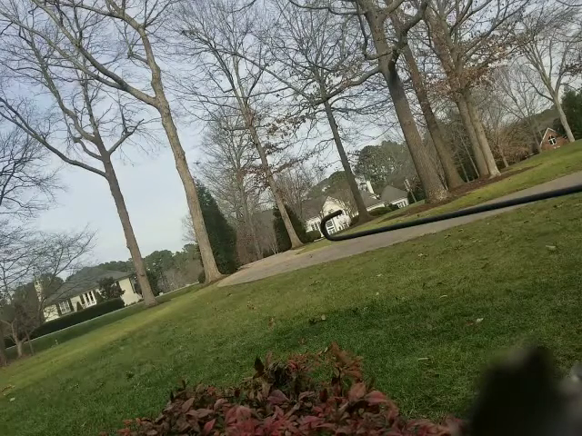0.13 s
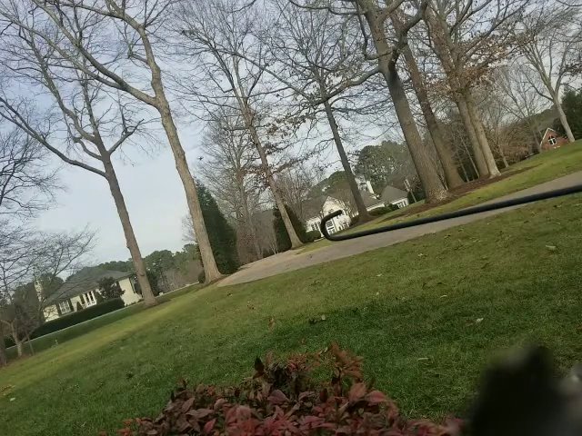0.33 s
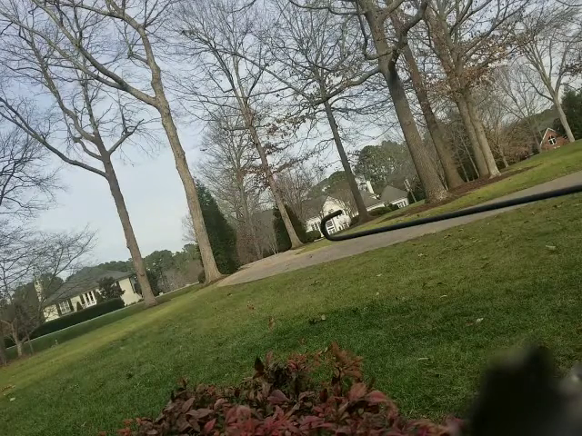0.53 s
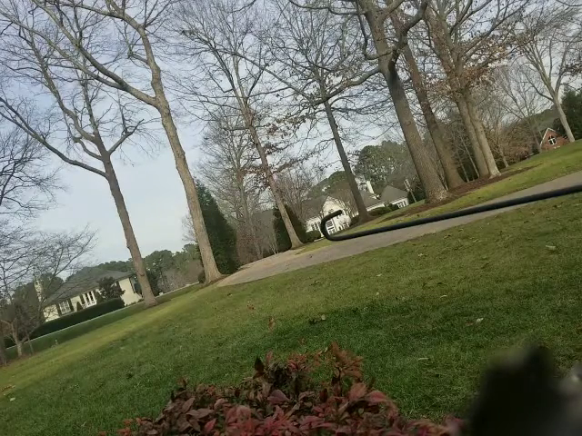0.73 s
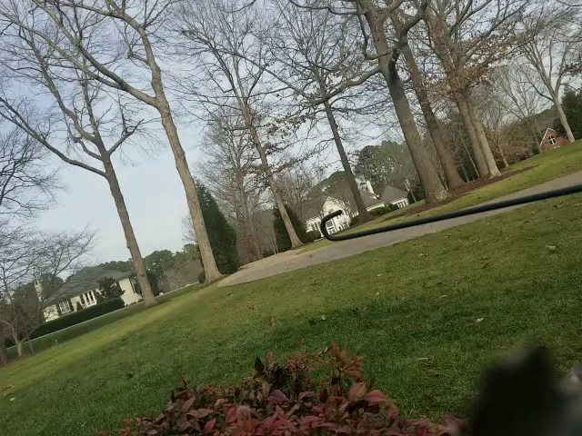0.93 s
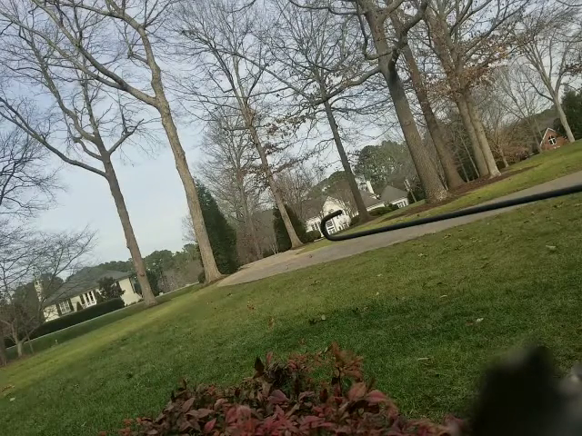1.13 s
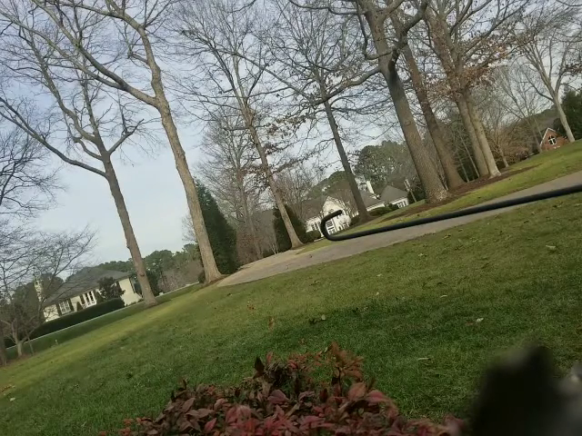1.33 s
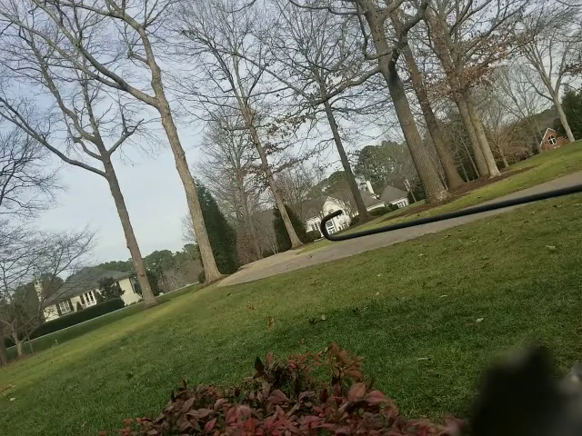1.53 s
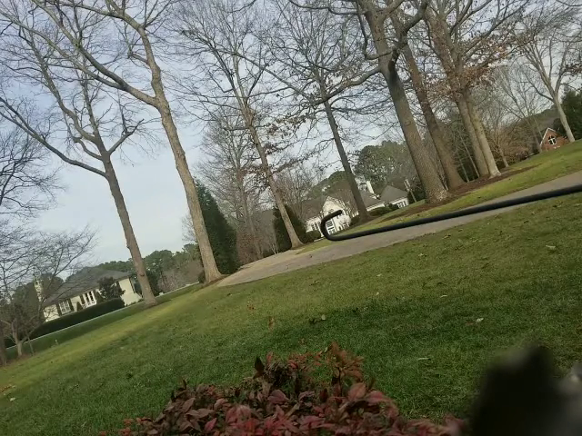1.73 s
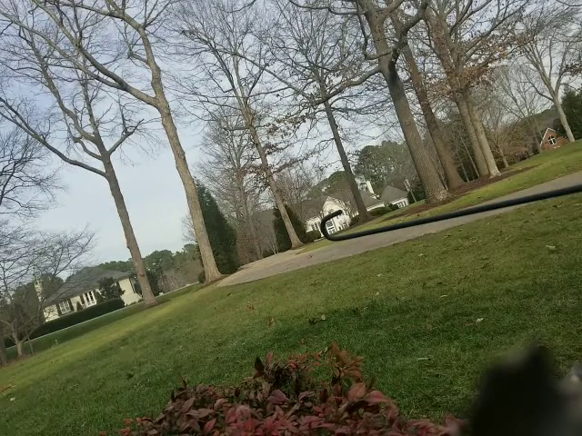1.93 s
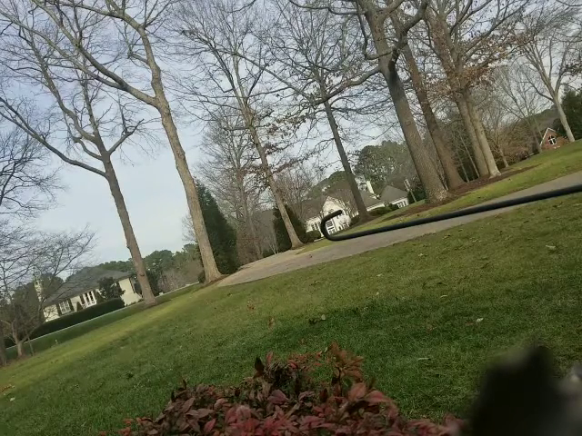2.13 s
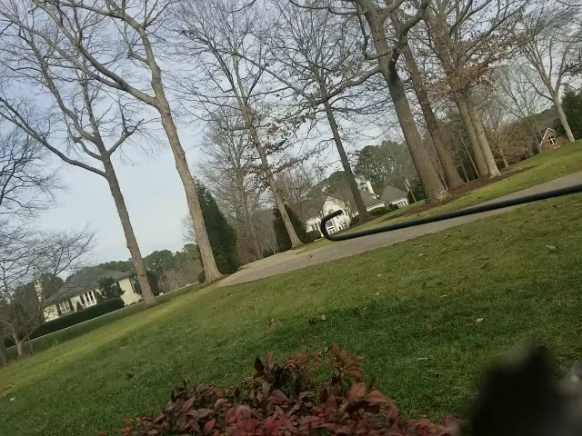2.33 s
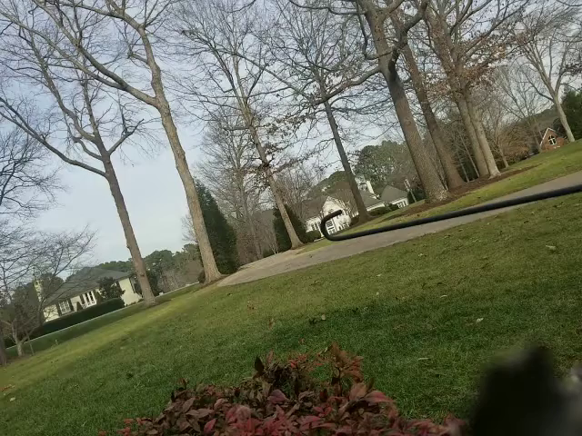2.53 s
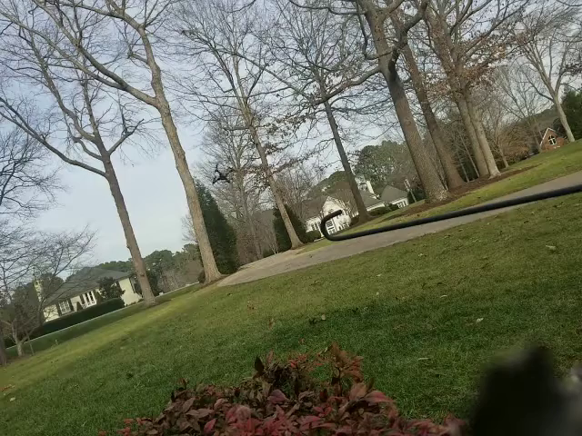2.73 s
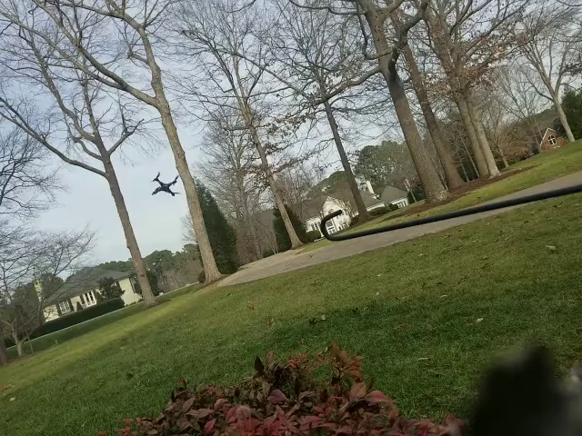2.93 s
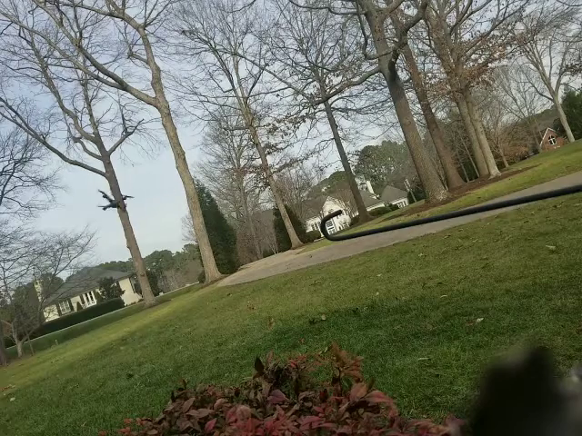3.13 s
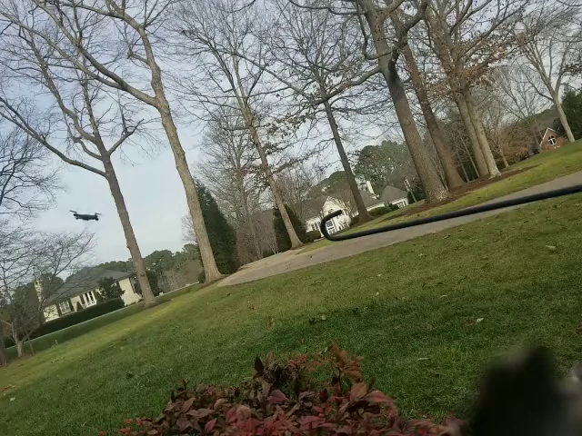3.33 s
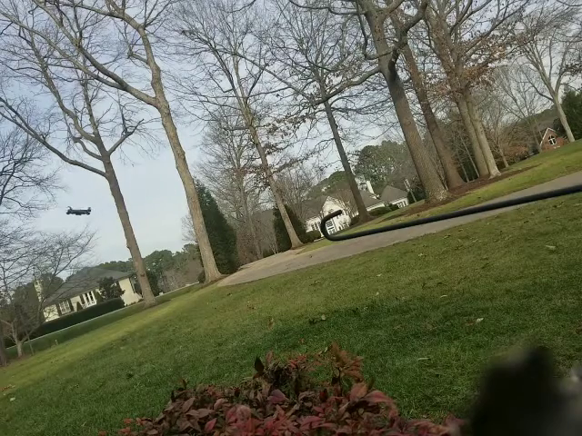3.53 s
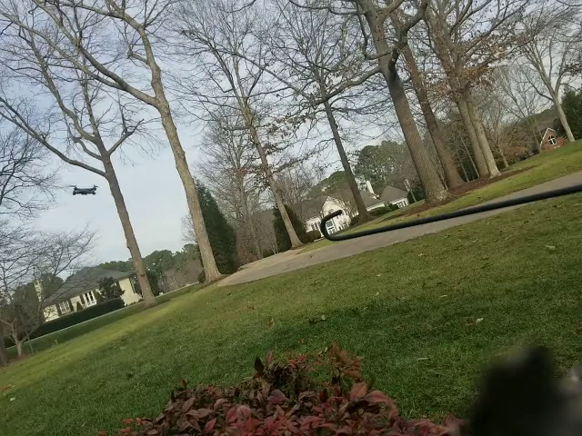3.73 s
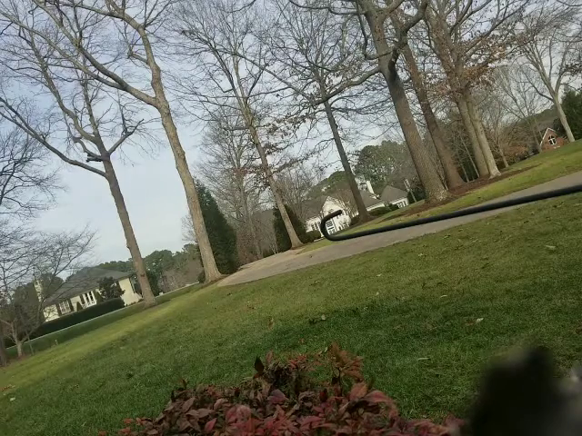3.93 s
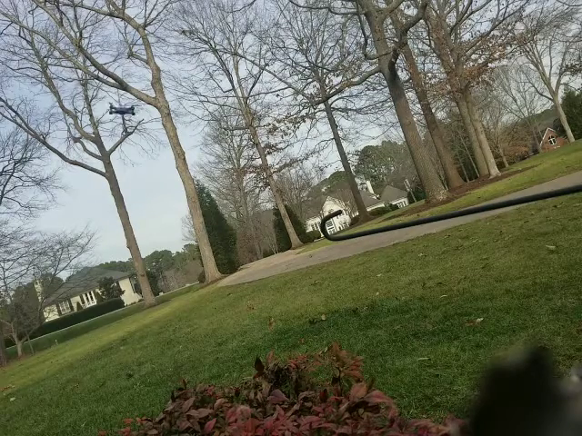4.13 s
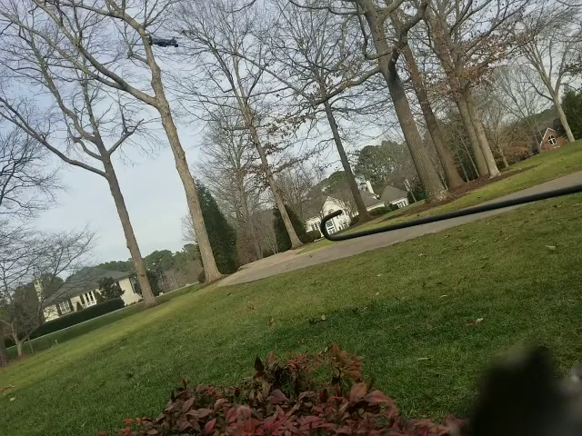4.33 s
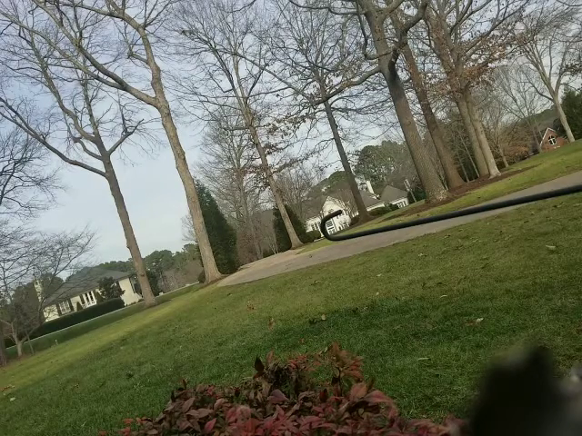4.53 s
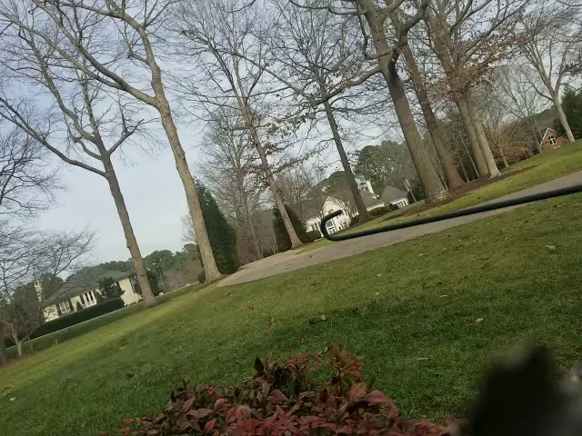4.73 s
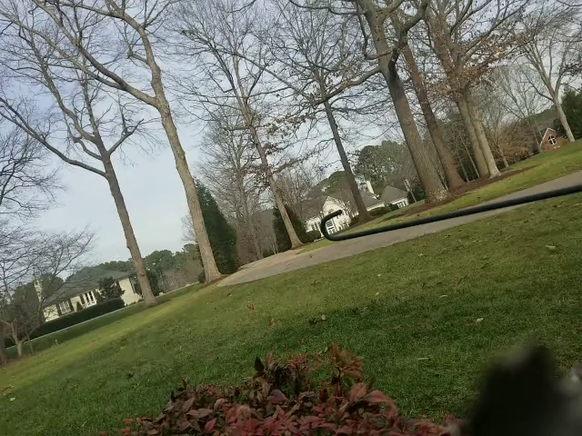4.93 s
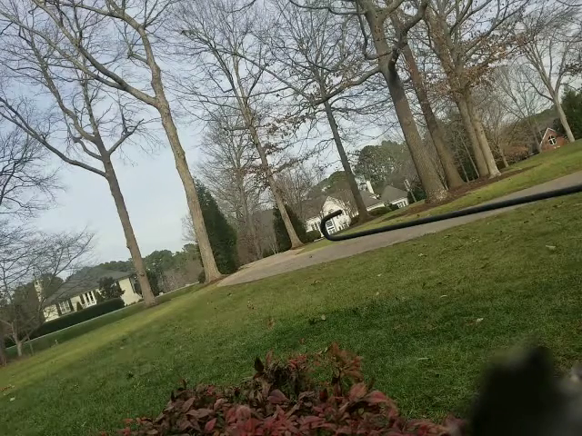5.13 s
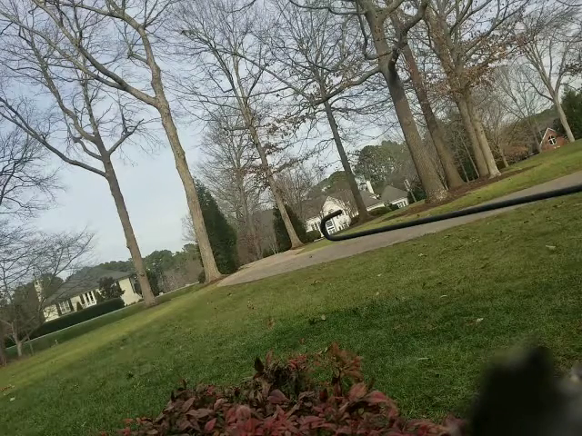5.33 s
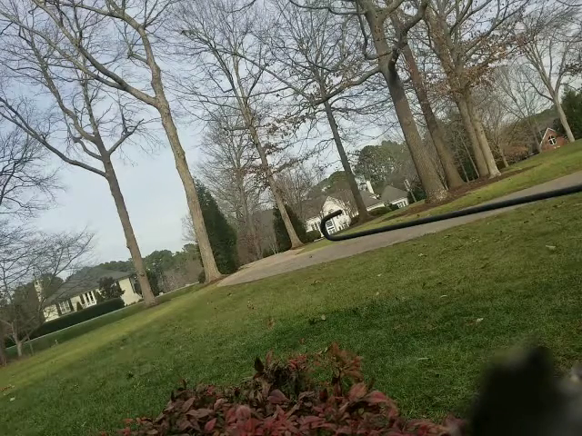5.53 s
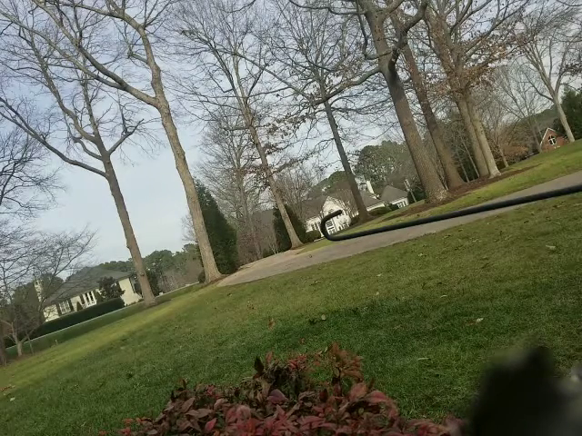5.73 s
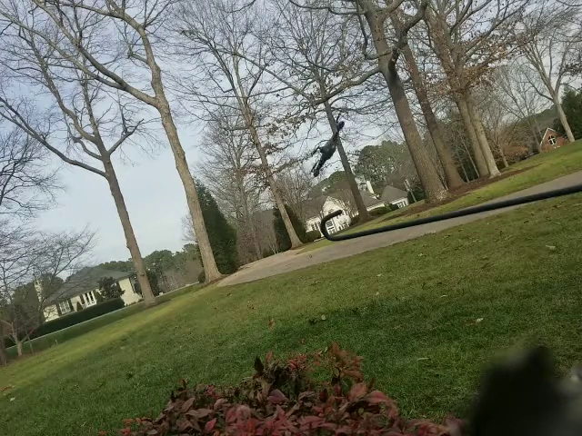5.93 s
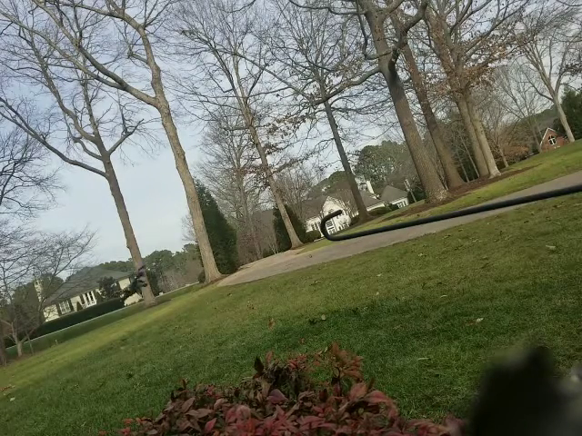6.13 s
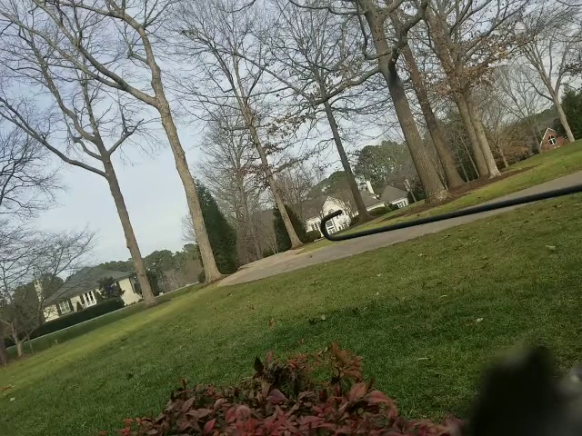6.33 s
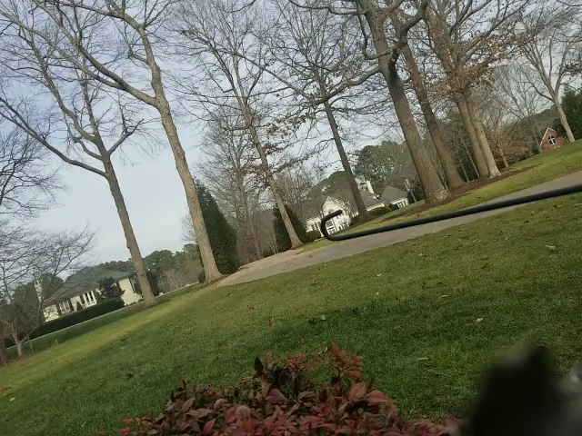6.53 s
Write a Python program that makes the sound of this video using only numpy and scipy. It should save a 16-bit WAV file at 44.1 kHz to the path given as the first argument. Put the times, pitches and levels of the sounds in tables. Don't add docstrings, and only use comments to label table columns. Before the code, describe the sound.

Outdoors in the grass, a toy drone's tiny motors whine in a rough, high cluster, with fizzing blade tips, grinding gears and fluttering air. It starts modestly, dips in pitch and snaps back, swoops nearer, dips deeply again, then revs up in a loud close pass before easing slightly. Low distant traffic rumbles underneath; the sound is dry and open, shifting a little between sides.

```python
import sys
import numpy as np
from scipy import signal
from scipy.fft import rfft, irfft, next_fast_len
from scipy.io import wavfile
from scipy.ndimage import uniform_filter1d, map_coordinates

SR = 44100
rng = np.random.default_rng(int(sys.argv[2]) if len(sys.argv) > 2 else 0)


def nominal_scale(level):
    x = np.asarray(level, float) / 20
    return 10 ** x


def waveform_to_disk(signal):
    frames = np.transpose(np.atleast_2d(signal))
    scaled = np.clip(frames, -1, 1) * 32767
    samples = np.round(scaled).astype(np.int16)
    wavfile.write(sys.argv[1], SR, samples)


N = 294147
TIME = np.arange(N) / SR
FFT_LENGTH = next_fast_len(N)
BINS_HZ = np.fft.rfftfreq(FFT_LENGTH, 1 / SR) + 1e-9


def columns(table):
    s, *rest = np.transpose(table)
    return [np.interp(TIME, s, c) for c in rest]


def spell(middle_s, length_s):
    return np.exp(-(2 * (TIME - middle_s) / length_s) ** 4)


def walk(rate_hz):
    hold = int(SR / rate_hz)
    steps = np.repeat(rng.standard_normal(N // hold + 1), hold)
    return 1.3 * uniform_filter1d(uniform_filter1d(steps, hold), hold)[:N]


def shape(x, gain):
    return irfft(rfft(x, FFT_LENGTH) * gain, FFT_LENGTH)[:N]


def tint(x, table):
    hz, db = np.transpose(table)
    return shape(x, nominal_scale(np.interp(np.log(BINS_HZ), np.log(hz), db)))


def bands(x, centres_hz):
    place = np.interp(np.log(BINS_HZ), np.log(centres_hz), np.arange(len(centres_hz)))
    return [shape(x, np.clip(1 - abs(place - k), 0, 1)) for k in range(len(centres_hz))]


def unit(x):
    return x / np.sqrt(np.mean(x ** 2))


def rasp(hz, db, width_hz):
    phase = 2 * np.pi * np.cumsum(hz) / SR
    return nominal_scale(db) * (walk(width_hz) * np.cos(phase) + walk(width_hz) * np.sin(phase))


# t/s, front f/Hz, left f/Hz, rear f/Hz, right f/Hz
MESH_SPEEDS = [(0, 2900, 4780, 3500, 4400), (.32, 4430, 5030, 3950, 5070), (.65, 4900, 4870, 4320, 5500),
               (1.57, 5120, 4700, 4030, 5500), (1.75, 3900, 3600, 3400, 4200),
               (2.07, 2900, 3200, 3700, 3500), (2.27, 4500, 3950, 4000, 5300),
               (2.65, 4770, 4350, 4180, 5800), (2.95, 4910, 4700, 4050, 5600),
               (3.2, 4950, 4400, 4350, 5750), (3.5, 5080, 4450, 4040, 5400), (3.87, 5170, 4590, 3890, 5800),
               (4.57, 5350, 4750, 4290, 5550), (4.9, 3300, 3700, 3000, 4000),
               (5.15, 2650, 3400, 3170, 3300), (5.56, 5000, 4700, 3800, 4520),
               (6.1, 5150, 5010, 4150, 4250), (6.67, 4500, 4500, 4150, 4250)]
# middle t/s, length t/s, mesh shift f/Hz
NUDGES = [
    [(2.36, .14, 100), (5.27, .2, 200)],
    [(4.45, .08, 130), (4.53, .08, -330), (4.72, .2, 350), (5.35, .3, 330)],
    [(5.78, .3, 200), (6.1, .15, -200), (6.35, .26, 370)],
    [(3.87, .25, 200), (4.3, .3, -180), (5.3, .2, -400)],
]


def throttle():
    hover_hz = 4823
    speeds = columns(MESH_SPEEDS)
    fast_db = 20 * np.log10(uniform_filter1d(np.mean(speeds, axis=0), SR // 20) / hover_hz)
    nudged = [v + sum(hz * spell(s, length) for s, length, hz in m) for v, m in zip(speeds, NUDGES)]
    return nudged, fast_db


# middle t/s, length t/s, downwash rise level/dB, passing tone rise level/dB, octave rise level/dB
SWINGS = [(0.07, 0.57, 6.5, -4, -1), (1.52, 0.72, 2.5, 2, 0), (2.298, 0.18, 5, -1, 0),
          (2.91, 1, 10.5, 0, 17.5), (3.217, 0.07, 0.5, 0, 9), (3.936, .5, -0.5, 3, 3),
          (4.587, 0.48, 1.5, 19, 5), (4.827, 0.37, 7, 3.5, 14), (5.182, 0.21, -5.5, 12, 13.5),
          (5.45, 0.22, 2.5, 3, -6), (5.76, 0.59, 2, 21.5, -11), (6.037, 0.11, 1.5, 1, 0),
          (6.437, 0.63, 6, 14.5, 1.5)]


def swings():
    return np.array(SWINGS)[:, 2:].T @ [spell(*row[:2]) for row in SWINGS]


# t/s, level/dB
LOUDNESS = [(0, -52.5), (.8, -54.5), (1.62, -51.5), (1.98, -54), (2.15, -47), (2.45, -44.5), (2.8, -44),
            (3.34, -41), (3.8, -42.5), (4.4, -41.5), (4.68, -36), (4.87, -36), (5.08, -45.5), (5.2, -37),
            (5.55, -33.5), (6.12, -35.5), (6.3, -38.5), (6.67, -42.5)]


def loudness_db():
    return columns(LOUDNESS)[0] - 3


# f/Hz, level/dB per Hz
AIR = [(120, -7), (200, -13.5), (360, -8), (480, -9.5), (700, -11), (940, -9), (1080, -3), (1250, -4.5),
       (1700, -12.5), (2600, -8), (5400, -4.5), (7300, 11), (9400, -6), (12800, -5), (14500, -8)]
# middle t/s, length t/s, rise level/dB
TIP_SIZZLE = [
    (.12, .4, 0.5),
    (1.45, 0.51, 2),
    (2.242, 0.11, 4.5),
    (2.48, 0.33, -2.5),
    (3.15, .15, 0.5),
    (3.8, 0.63, 1.5),
    (4.449, .3, 1.5),
    (4.82, 0.15, 3),
    (5.883, 0.36, 3),
    (6.227, .15, 1.5),
]


def rush(chop, swing_db, fast_db):
    wash_db = swing_db - 15
    hiss_db = -4 + fast_db
    tip_db = 0.6 + 2.2 * fast_db + sum(g * spell(s, length) for s, length, g in TIP_SIZZLE)
    air = tint(rng.standard_normal(N), AIR)
    wash, knee, mid, high, hiss, tip = bands(air, [950, 1100, 2300, 4300, 7200, 12000])
    swell_db = 1.14 * walk(8)
    parts = [(wash, wash_db), (knee, 0.23 * wash_db - 9.5), (mid, -3), (high, -3),
             (hiss, hiss_db), (tip, tip_db + swell_db)]
    flickering = sum(unit(p) * nominal_scale(db + walk(11)) for p, db in parts)
    return chop * nominal_scale(loudness_db() + swell_db) * flickering


# f/Hz, level/dB per Hz
TRAFFIC = [(12, -46), (20, -10), (43, -9), (65, 1), (139, -6), (214, -17.5), (378, -21.5), (520, -26),
           (550, -24), (720, -57), (1210, -120)]


def traffic():
    mid, side = (unit(tint(rng.standard_normal(N), TRAFFIC)) for _ in range(2))
    return nominal_scale(-55 + walk(2)) * (mid + .4 * side * np.array([[1], [-1]]))


# middle t/s, length t/s, whine rise level/dB
FACING = [
    [(.35, .6, 12), (1.15, 1.0, 10), (1.72, .2, 2), (2.23, .18, 12), (2.8, .5, 11), (3.75, .35, 9),
     (4.25, .5, 10), (5.75, .3, 3), (6.4, .7, -5)],
    [(.25, .35, 4), (1.3, .5, 7), (2.95, .6, 8), (4.15, 1.3, 9), (5.9, .4, 4)],
    [(.5, .6, 3), (2.25, .15, 5), (2.65, .3, 6), (3.15, .3, 8), (3.6, .35, 7), (4.2, .4, 5), (5.7, .55, 13),
     (6.1, .2, 6), (6.52, .45, 16)],
    [(.6, 1.2, -4), (1.4, .4, 4), (2.8, .35, 3), (3.75, 1.0, -7), (4.45, .25, 4), (5.2, .5, 5)],
]


def exposure_db(fast_db):
    hidden_db = -24 + 1.2 * np.minimum(fast_db, 0)
    return [hidden_db + sum(db * spell(s, length) for s, length, db in m) for m in FACING]


# multiple of motor turn, level/dB
ORDERS = [(3, -8), (4, -7), (5, -4), (6, -5), (7, -14), (8, -8), (9, 2.5), (10, -12), (13, -19), (14, -16),
          (15, -18)]


def motor(mesh_hz, db, low_db):
    turn_hz = uniform_filter1d(mesh_hz * (1 + .003 * walk(6)), SR // 16) / 9
    turn = 2 * np.pi * np.cumsum(turn_hz * (1 + .0025 * walk(30))) / SR
    rough = 1 + nominal_scale(-6) * walk(300)
    flutter_db = 1.8 * walk(5.7)
    whine = 0
    for k, order_db in ORDERS:
        line_db = order_db + (k < 7) * low_db + np.roll(flutter_db, k * N // 20)
        whine = whine + nominal_scale(line_db) * np.sin(k * turn + k * k)
    return nominal_scale(db) * rough * whine, turn / 3


# f/Hz, width f/Hz, level/dB
FRAME = [
    (1120, 220, -23),
    (2800, 41, -19),
    (3720, 690, -1),
    (7150, 3370, 10.5),
]


def frame(whine):
    ring = 1 + sum(nominal_scale(db + 5.5) / (1 + (2 * (BINS_HZ - hz) / width) ** 2) for hz, width, db in FRAME)
    return shape(whine, ring / 2)


def blade_chop(blades):
    return 1 + 0.092 * sum(np.cos(b) + 0.64 * np.cos(b / 2) for b in blades) / 2


def thumps(blades, own_db, tone_db, octave_db):
    out = sum(nominal_scale(-72.5 + tone_db + 1.5 * walk(6)) * np.sin(b) for b in blades[:2])
    for b, db in zip(blades, own_db):
        out = out + nominal_scale(-56 + octave_db + 1.3 * db + 2.8 * walk(4.77)) * np.sin(2 * b)
    return out


# f/Hz, level/dB
BUZZ = [(300, -52), (500, -17), (950, -15), (1100, 0.5), (2200, -30.5), (3000, 7)]


def slaps(blades, own_db, all_db, swing_db):
    pulses = sum(nominal_scale(db + 2.5 * walk(6)) * np.exp(30 * (np.cos(b) - 1)) for b, db in zip(blades, own_db))
    return nominal_scale(all_db + 21.5 + 0.13 * swing_db) * tint(pulses, BUZZ)


# middle t/s, length t/s, share of own mesh pitch, level/dB over the rush
GRIND = [
    (.85, 1.6, .99, -.5),
    (1.95, .45, 1.0, -8),
    (2.27, .2, .97, 1),
    (2.8, .65, .67, 1.5),
    (3.95, 1.4, .97, -.5),
    (5.3, 1.0, .93, 3),
    (5.95, .5, .95, 1.5),
    (6.5, .5, 1.0, 4),
]
GRINDERS = (0, 0, 0, 0, 1, 2, 2, 2)


def gears(speeds, all_db, fast_db):
    heard = np.array([spell(s, length) for s, length, _, _ in GRIND]) ** 3 + 1e-30
    heard = heard / heard.sum(axis=0)
    hz = sum(h * g[2] * speeds[m] for h, m, g in zip(heard, GRINDERS, GRIND))
    grind_db = sum(h * g[3] for h, g in zip(heard, GRIND))
    return rasp(hz, all_db + grind_db - 3.5 + .6 * fast_db + 1.2 * walk(6), width_hz=950)


# start t/s, from f/Hz, to f/Hz, rise t/s, level/dB over the rush
SPINUPS = [
    (.08, 5970, 8140, 0.19, 2),
    (2.13, 6240, 8760, 0.16, 1),
    (5.14, 3900, 6800, .14, 1.5),
]


def tips(all_db, fast_db):
    band_db = all_db - 2 + 3.2 * fast_db + 2.1 * walk(4)
    band = rasp(7315 * nominal_scale(.4 * fast_db), band_db, width_hz=900)
    hz, gain = SPINUPS[0][1], 0
    for s, from_hz, to_hz, rise_s, db in SPINUPS:
        part = np.clip((TIME - s) / rise_s, 0, 1.3)
        hz = np.where(TIME > s - rise_s, from_hz + (to_hz - from_hz) * np.sin(part * 1.1), hz)
        gain = gain + nominal_scale(db) * spell(s + .6 * rise_s, 1.3 * rise_s)
    return band + gain * rasp(hz, all_db, width_hz=910)


# middle t/s, length t/s, level/dB
SHAFT = (5.75, 1, -54.5)


def shaft_hum(blade):
    middle_s, length_s, db = SHAFT
    return spell(middle_s, length_s) * nominal_scale(db + 2.5 * walk(5)) * np.sin(3 * blade)


# t/s, left lag behind right t/ms
BEARING = [(0, -0.04), (1.7, -0.031), (2.4, 0.066), (2.8, 0.024), (3.25, -0.14), (3.6, -0.153),
           (4.1, -0.14), (4.55, -0.061), (5.2, 0.237), (5.6, 0.35), (5.85, .3), (6.35, -0.18), (6.67, -.25)]
# f/Hz, level/dB under the direct rush
SCATTER = [(300, -7.5), (2000, -5.5), (5000, -3), (9000, -1.5)]
# f/Hz, left minus right level/dB
EARS = [(60, -6), (300, -2), (1500, -4), (3500, -3), (5500, -2.5), (7500, -0.5), (10000, -7), (13000, -2)]


def microphones(direct, swing_db, fast_db):
    lag_ms = uniform_filter1d(columns(BEARING)[0], SR // 5)
    lag_samples = lag_ms * SR / 1000
    pan_db = 5.5 - 6.5 * lag_ms
    ears = []
    for sign in (.5, -.5):
        heard = map_coordinates(direct, [np.arange(N) - sign * lag_samples], order=3, mode="mirror")
        heard = heard * nominal_scale(sign * pan_db) + tint(rush(1.0, swing_db, fast_db), SCATTER)
        ears.append(tint(heard, [(f, sign * db) for f, db in EARS]))
    return np.array(ears)


def scene():
    speeds, fast_db = throttle()
    swing_db, tone_db, octave_db = swings()
    own_db = exposure_db(fast_db)
    all_db = uniform_filter1d(loudness_db(), SR // 10)
    low_db = 1 + .3 * octave_db
    motors = [motor(hz, all_db + db + 7.5, low_db) for hz, db in zip(speeds, own_db)]
    whines, blades = zip(*motors)
    chop = blade_chop(blades)
    direct = rush(chop, swing_db, fast_db) + frame(sum(whines))
    direct += thumps(blades, own_db, tone_db, octave_db) + slaps(blades, own_db, all_db, swing_db)
    direct += chop * (gears(speeds, all_db, fast_db) + tips(all_db, fast_db))
    direct += shaft_hum(blades[3])
    return microphones(direct, swing_db, fast_db) + traffic()


def low_pass(x):
    return signal.sosfilt(signal.butter(12, 14540, fs=SR, output="sos"), x)


def record(dry):
    return low_pass(dry)


dry = scene()
out = record(dry)
waveform_to_disk(out)
```